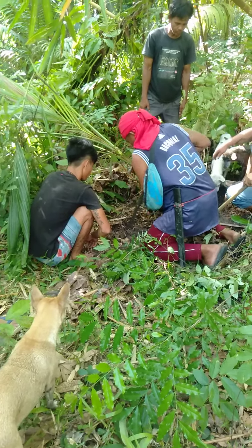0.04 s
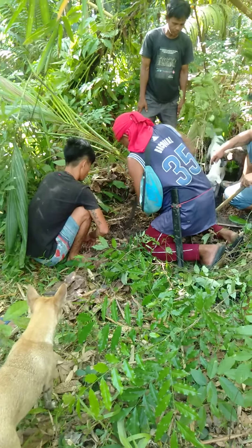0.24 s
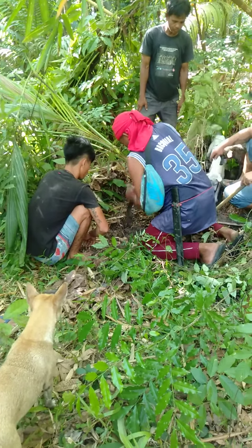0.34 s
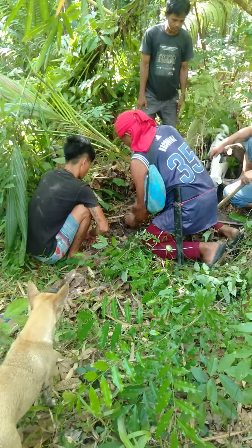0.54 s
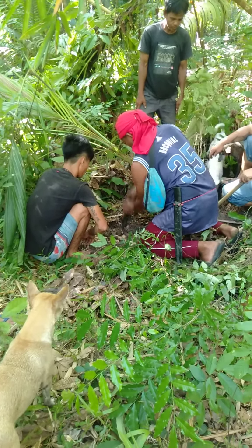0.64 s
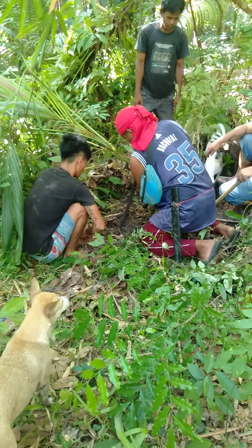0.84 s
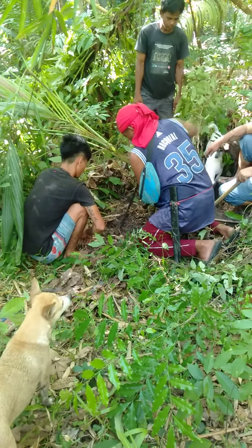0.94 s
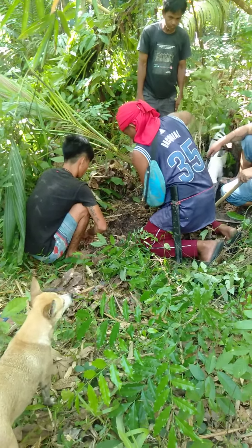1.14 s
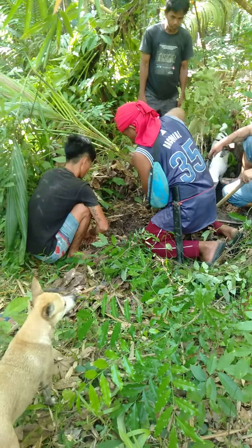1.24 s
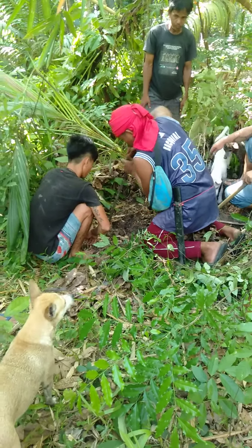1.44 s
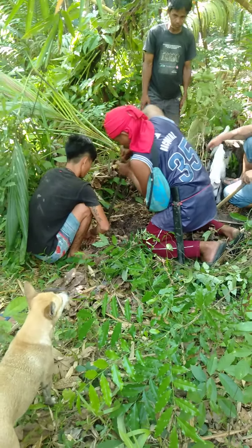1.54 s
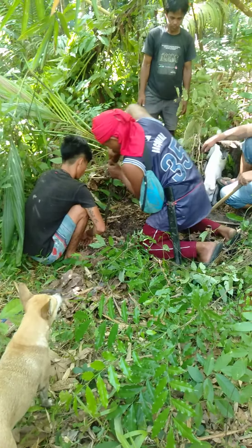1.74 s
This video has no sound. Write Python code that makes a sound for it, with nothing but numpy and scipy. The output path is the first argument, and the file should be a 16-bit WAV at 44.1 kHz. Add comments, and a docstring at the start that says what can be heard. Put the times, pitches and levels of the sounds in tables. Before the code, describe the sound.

A dog close by lets out one loud, high whine that falls and cracks at the end. A faint hoarse whimper and thin nasal whistles follow, with a slight echo over quiet forest background noise.

```python
"""A forest, quiet floor noise, a dog close by. It gives one loud falling whine that cracks at the end,
framed by thin nasal whistles, then a short hoarse rising whimper and more whistles. The voice is a stack
of harmonics plus throat turbulence; the whistles are fluttering sines. Something thuds softly on the
soil, twigs snap, leaves rustle. Ground, leaves and trunks return a faint echo."""
import sys
import numpy as np
from scipy import signal
from scipy.fft import rfft, irfft, next_fast_len
from scipy.io import wavfile
from scipy.ndimage import uniform_filter1d, map_coordinates

SR = 44100
rng = np.random.default_rng(int(sys.argv[2]) if len(sys.argv) > 2 else 0)


def generate_wav(signal):
    """Clip the signal to [-1, 1] and save it as 16-bit WAV at the path in sys.argv[1]."""
    frames = np.transpose(np.atleast_2d(signal))
    scaled = np.clip(frames, -1, 1) * 32767
    pcm = np.round(scaled).astype(np.int16)
    wavfile.write(sys.argv[1], SR, pcm)


N = 79380

# Forest floor spectrum. Each row: frequency in Hz, gain in dB.
FLOOR_COLOUR = [(15, -42.5), (25, -3.5), (85, -1), (107, -5), (179, -12), (276, -18), (352, -16),
                (600, -16.5), (1100, -16), (1470, -15), (2590, -22), (3130, -26.5), (7030, -25),
                (10300, -34.5), (15800, -28)]
# Short whistles. Each row: start and length in seconds, first, middle and last pitch in Hz,
# level in dB, octave in dB relative to that level.
SHORT_WHISTLES = [(-.002, 0.015, 6300, 6470, 6080, -55, -15),
                  (0.201, 0.0058, 6500, 6490, 6500, -41.5, -55.5),
                  (0.204, 0.057, 6460, 6742, 6620, -35, -42),
                  (0.248, 0.017, 6950, 6930, 6820, -50.5, -33.5),
                  (.256, 0.019, 7200, 7220, 7310, -57.5, -32.5), (0.862, 0.019, 6420, 6660, 6600, -36, -37),
                  (0.876, .01, 6460, 6470, 6600, -48, -35), (1.25, 0.041, 6060, 6035, 6050, -51.5, -19),
                  (1.28, 0.025, 6200, 6200, 6180, -63, -2)]
# Long whistle. Each row: time in seconds, pitch in Hz, level in dB, octave level in dB.
LONG_WHISTLE_PATH = [(1.457, 6200, -78, -91), (1.466, 6500, -57, -88), (1.485, 6510, -51.5, -71),
                     (1.503, 6415, -44.5, -99), (1.53, 6415, -43, -96), (1.556, 6370, -52, -70),
                     (1.585, 6380, -50, -73), (1.63, 6230, -59.5, -68), (1.647, 6314, -56, -69),
                     (1.664, 6340, -46.5, -61), (1.678, 6600, -61.5, -83)]
# Thuds. Each row: peak time in seconds, pitch in Hz, level in dB.
SOIL_THUDS = [(0.17, 169, -60.5), (1.03, 234, -52)]
# Whine melody. Each row: time in seconds, pitch in Hz.
WHINE_GLIDE = [(0.235, 1208), (0.245, 1190), (0.299, 1250), (0.333, 1143), (0.371, 1080), (0.451, 1079),
               (0.549, 1033), (0.609, 1005), (0.699, 873.6), (0.761, 835.7), (0.819, 832.6), (0.835, 812.6),
               (0.845, 750), (0.853, 700), (0.865, 580), (0.87, 555)]
# Whine timbre as the mouth opens. Each row: time in seconds, levels of harmonics 1, 2 and 3 in dB.
WHINE_HARMONICS = [(.228, -75, -95.5, -102), (.241, -42.5, -81, -86.5), (.252, -27, -50.5, -68.5),
                   (.311, -27, -52.5, -75), (.323, -21.5, -51.5, -54.5), (.355, -23.5, -41.5, -51),
                   (.372, -33.5, -27, -48.5), (.44, -31, -28, -50.5), (.465, -27, -32, -49),
                   (.508, -39, -29, -54), (.533, -26, -26, -52.5), (.612, -23.5, -25.5, -57),
                   (.628, -25.5, -29, -46.5), (.641, -30.5, -22.5, -35.5), (.672, -42, -27, -41),
                   (.692, -35.5, -24.5, -32), (.713, -41, -29, -36.5), (.725, -51.5, -29.5, -49.5),
                   (.775, -43.5, -31.5, -40.5), (.822, -48.5, -36.5, -44), (.84, -33, -40.5, -50),
                   (.852, -30.5, -39, -53), (.862, -44.5, -37.5, -58), (.875, -100, -48.5, -69)]
# Spectrum of the whine's overtones. Each row: frequency in Hz, level in dB.
OVERTONE_COLOUR = [(3000, -46), (3330, -45.5), (3520, -52.5), (3780, -44.5), (3950, -55), (4080, -68),
                   (4170, -77), (4330, -66.5), (4650, -84), (5020, -69), (5220, -73), (5400, -69),
                   (5750, -62), (6100, -69), (6500, -65), (6850, -64), (7250, -78), (7600, -75),
                   (8600, -88)]
# Envelope on those overtones. Each row: time in seconds, gain in dB.
OVERTONE_GAIN = [(.29, -16), (.33, 1), (.47, -2), (.54, -7), (.71, -6), (.77, -1), (.828, -2), (.853, -22)]
# Whine, clean until the voice breaks. Each row: time in seconds, roughness from 0 to 1.
WHINE_ROUGHNESS = [(.24, .003), (.305, .005), (.345, .014), (.41, .006), (.6, .005), (.7, .011),
                   (.828, .014), (.845, .08), (.855, .24), (.862, .11), (.87, .1)]
# Throat turbulence spectrum. Each row: frequency in Hz, gain in dB.
RASP_COLOUR = [(400, -37.5), (650, -18), (1100, -14), (1800, 5), (2600, -9), (3400, -9.5), (3850, -18.5),
               (5500, -10), (6800, -10.5), (9000, -28), (16000, -30.5)]
# Twig snaps. Each row: start in seconds, level in dB.
TWIG_SNAPS = [(.532, -54), (0.551, -45.5), (0.685, -53), (0.693, -62)]
# Snap spectrum. Each row: frequency in Hz, gain in dB.
TWIG_COLOUR = [(1500, -24), (4000, -14), (6000, -4), (8200, 2.5), (10000, -18.5), (16000, -7)]
# Rustles. Each row: peak time and width in seconds, centre in Hz, spread in octaves, level in dB.
LEAF_RUSTLES = [(.556, 0.018, 6600, 0.26, -60.5), (0.689, 0.017, 6840, 0.24, -60.5),
                (1.041, 0.037, 1940, 0.88, -65), (1.346, 0.012, 3300, 0.23, -61),
                (1.663, 0.012, 1330, 0.79, -58.5), (1.722, 0.0066, 4270, 0.68, -56.5),
                (1.774, 0.0058, 1600, 0.26, -58.5)]
# Whimper. Each row: time in seconds, pitch in Hz, gain in dB.
WHIMPER_PATH = [(1.192, 405, -70), (1.198, 429.5, -61), (1.209, 461.3, -53), (1.222, 525, -53.5),
                (1.230, 535, -47), (1.238, 641, -48), (1.246, 673, -49.5), (1.253, 743, -72)]
# Whimper, raspy but clearing briefly. Each row: time in seconds, roughness from 0 to 1.
WHIMPER_ROUGHNESS = [(1.195, .7), (1.213, .65), (1.229, .2), (1.238, .3), (1.248, .5)]
# Throat resonances in the whimper. Each row: frequency in Hz, gain in dB.
THROAT_COLOUR = [(250, -36), (420, 1), (560, -10), (680, 3.5), (850, -3), (1000, 2), (1130, 9),
                 (1300, -6.5), (1550, -20), (1950, -5), (2700, -18.5), (3450, -8), (4200, -48), (6000, -35)]
# Trunk echo spectrum. Each row: frequency in Hz, gain in dB.
TRUNK_COLOUR = [(650, -14), (850, 0), (1200, -4.5), (1700, 1), (2100, -0.5), (2500, 10), (3300, 2.5),
                (6500, 1), (14000, -1)]
# Trunk echo decay. Each row: frequency in Hz, T60 in seconds.
TRUNK_T60 = [(300, 0.2), (1000, 0.88), (1700, 0.6), (3300, 0.44), (6500, 0.61)]


def amp(db):
    """Decibels to gain."""
    return 10 ** (np.asarray(db) / 20)


def unit(x):
    """Scale to rms 1."""
    return x / np.sqrt(np.mean(x ** 2) + 1e-20)


def clock():
    """Sample times in seconds."""
    return np.arange(N) / SR


def along(points, hz):
    """(Hz, value) points read on a log axis."""
    knots_hz, values = np.transpose(points)
    return np.interp(np.log(hz + 1), np.log(knots_hz + 1), values)


def curves(rows):
    """One value per sample for each column after the time."""
    times_s, *columns = np.transpose(rows)
    return [np.interp(clock(), times_s, column) for column in columns]


def gate(rows):
    """Open from a table's first time to its last, soft edges."""
    t = clock()
    return uniform_filter1d(((t > rows[0][0]) & (t < rows[-1][0])) * 1., size=128)


def arch(start_s, length_s):
    """Half-sine envelope."""
    return np.abs(np.sin(np.pi * np.clip((clock() - start_s) / length_s, 0, 1)))


def bell(peak_s, width_s):
    """Gaussian envelope."""
    return np.exp(-.5 * ((clock() - peak_s) / width_s) ** 2)


def wobble(rate_hz):
    """Smooth random curve, rate_hz knots a second."""
    return map_coordinates(rng.standard_normal(8192), [clock() * rate_hz], mode="wrap")


def filtered(x, response):
    """Apply a gain given as a function of Hz."""
    size = next_fast_len(N + 8192)
    return irfft(rfft(x, size) * response(np.fft.rfftfreq(size, 1 / SR)), size)[:N]


def noise(colour):
    """Noise of rms 1 shaped by (Hz, dB) points."""
    return unit(filtered(rng.standard_normal(N), lambda hz: amp(along(colour, hz))))


def hiss(centre_hz, octaves):
    """Bell-shaped noise band of rms 1."""
    white = rng.standard_normal(N)
    return unit(filtered(white, lambda hz: np.exp(-.5 * (np.log2((hz + 1) / centre_hz) / octaves) ** 2)))


def turning(hz, jitter):
    """Oscillator phase; jitter is a fraction of the pitch."""
    return 2 * np.pi * np.cumsum(hz * (1 + jitter * wobble(260))) / SR


def tone(phase):
    """Sine of rms 1."""
    return np.sqrt(2) * np.sin(phase)


def forest_floor(level_db=-60.5):
    """Steady background noise, strongest in the bass."""
    return amp(level_db) * noise(FLOOR_COLOUR)


def short_whistles(jitter=.002, flutter_db=2.5, second_db=-65, sum_tone_db=-57.5):
    """Thin fluttering tones from the nose, each with a weaker octave."""
    t = clock()
    out = np.zeros(N)
    for start_s, length_s, *pitches_hz, db, octave_db in SHORT_WHISTLES:
        hz = np.interp(t, [start_s, start_s + length_s / 2, start_s + length_s], pitches_hz)
        phase = turning(hz, jitter)
        swell = arch(start_s, length_s) ** .87 * amp(db + flutter_db * wobble(199.2))
        out += swell * (tone(phase) + amp(octave_db) * tone(2 * phase))
    # A second whistle joins the last one and adds their sum tone.
    start_s, length_s = 1.247, .042
    second_hz = np.interp(t, [start_s, start_s + length_s], [8400, 8000])
    second_phase = turning(second_hz, jitter)
    joining = amp(second_db) * tone(second_phase) + amp(sum_tone_db) * tone(phase + second_phase)
    return out + arch(start_s, length_s) * joining


def thuds(width_s=.0065):
    """Soft knocks on soil: brief low tone pulses."""
    return sum(amp(db) * bell(peak_s, width_s) * tone(turning(hz, jitter=.053))
               for peak_s, hz, db in SOIL_THUDS)


def whine(shimmer_db=.5, croak_db=6, croak_rate_hz=270, air_db=-46.5):
    """Falling voice with throat rasp and airflow hiss; strength passes from fundamental to overtones."""
    hz, = curves(WHINE_GLIDE)
    rough, = curves(WHINE_ROUGHNESS)
    gains = [amp(db + shimmer_db * wobble(110) + croak_db * rough * wobble(croak_rate_hz))
             for db in curves(WHINE_HARMONICS)]
    loudness = np.sqrt(sum(gain ** 2 for gain in gains))
    phase = turning(hz, jitter=.0006 + .16 * rough)
    voice = sum(gain * tone(k * phase) for k, gain in enumerate(gains, 1))
    voice += overtones(phase, hz) + period_doubling(phase) + voice_crack()
    rasp = unit(noise(RASP_COLOUR) * (1 + np.cos(phase)))  # one puff a cycle
    air = amp(air_db) * hiss(centre_hz=15000, octaves=.35)
    return gate(WHINE_HARMONICS) * (voice + loudness * (rough * rasp + air))


def overtones(phase, hz, max_depth=.7, flicker_hz=30):
    """Whine harmonics 4 to 10, each fading in and out at random."""
    gain_db, = curves(OVERTONE_GAIN)
    out = np.zeros(N)
    for k in range(4, 11):
        depth = max_depth * min((k - 3.5) / 2, 1)
        in_phase = (1 + depth * wobble(flicker_hz)) * tone(k * phase)
        quadrature = depth * wobble(flicker_hz) * tone(k * phase + np.pi / 2)
        fading = (in_phase + quadrature) / np.sqrt(1 + 2 * depth ** 2)
        out += amp(gain_db + along(OVERTONE_COLOUR, k * hz)) * fading
    return out


def period_doubling(phase, level_db=-58.5, upper_db=-12.5):
    """Faint lines between the harmonics in mid-whine."""
    lines = tone(2.5 * phase) + amp(upper_db) * tone(3.5 * phase)
    return amp(level_db) * arch(start_s=.39, length_s=.16) * lines


def twigs(t60_s=.019):
    """Snapping twigs: bright noise, instant attack, fast decay."""
    t = clock()
    envelope = sum((t >= start_s) * amp(db - 60 * np.abs(t - start_s) / t60_s)
                   for start_s, db in TWIG_SNAPS)
    return envelope * noise(TWIG_COLOUR)


def leaves(grain_db=2, grain_rate_hz=650):
    """Rustling leaves: short swells of grainy band noise."""
    out = np.zeros(N)
    for peak_s, width_s, centre_hz, octaves, db in LEAF_RUSTLES:
        grains = unit(hiss(centre_hz, octaves) * amp(grain_db * wobble(grain_rate_hz)))
        out += amp(db) * bell(peak_s, width_s) * grains
    return out


def voice_crack(hz=3380, level_db=-44.5):
    """Unsteady squeak as the whine breaks."""
    return amp(level_db) * arch(start_s=.849, length_s=.011) * tone(turning(hz, jitter=.025))


def whimper(shimmer_db=2, rasp_db=1):
    """Hoarse upward squeak: voice and turbulence through the same throat resonances."""
    hz, db = curves(WHIMPER_PATH)
    rough, = curves(WHIMPER_ROUGHNESS)
    phase = turning(hz, jitter=.0243)
    voice = np.zeros(N)
    for k in range(1, 7):
        gain = amp(along(THROAT_COLOUR, k * hz) + shimmer_db * min(k / 4, 1) * wobble(300))
        offset_rad = rng.uniform(0, 2 * np.pi) + (k - 1) * rough * wobble(440)
        voice += gain * tone(k * phase + offset_rad)
    puffs = unit(noise(THROAT_COLOUR) * (1 + .5 * np.cos(phase)))
    return gate(WHIMPER_PATH) * amp(db) * (voice + amp(rasp_db) * rough * puffs)


def long_whistle(flutter_db=1.5):
    """Closing nasal whistle: a wavering tone and its weak octave."""
    hz, db, octave_db = curves(LONG_WHISTLE_PATH)
    phase = turning(hz, jitter=.00082)
    envelope = gate(LONG_WHISTLE_PATH) * amp(flutter_db * wobble(90))
    return envelope * (amp(db) * tone(phase) + amp(octave_db) * tone(2 * phase))


def forest_echo(x, tail_db=-18, near_db=-26.5, near_t60_s=.23, delay_s=.014):
    """Quick scatter from ground and leaves, longer tail from the trunks."""
    hz, t, spectrum = signal.stft(rng.standard_normal(SR), SR, nperseg=256)
    decay_db = along(TRUNK_COLOUR, hz)[:, None] - 60 * t / along(TRUNK_T60, hz)[:, None]
    tail = signal.istft(spectrum * amp(decay_db), SR, nperseg=256)[1][:SR]
    near = rng.standard_normal(SR) * amp(-60 * np.arange(SR) / SR / near_t60_s)
    response = amp(tail_db) * tail / np.linalg.norm(tail) + amp(near_db) * near / np.linalg.norm(near)
    return signal.fftconvolve(x, np.pad(response, (int(delay_s * SR), 0)))[:N]


def scene():
    """Dog and ground sounds with their echo, over the forest floor. Mono."""
    dog = whine() + whimper() + long_whistle() + short_whistles()
    direct = dog + thuds() + twigs() + leaves()
    return (direct + forest_floor() + forest_echo(direct))[None]


def record(dry):
    """Brick-wall low-pass."""
    top_hz = 15850
    return np.array([filtered(x, lambda hz: hz < top_hz) for x in dry])


dry = scene()
out = record(dry)
generate_wav(out)
```